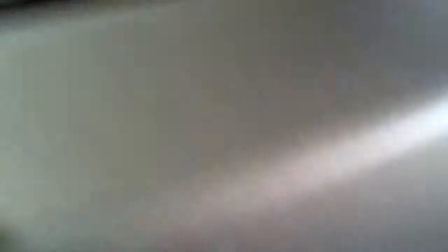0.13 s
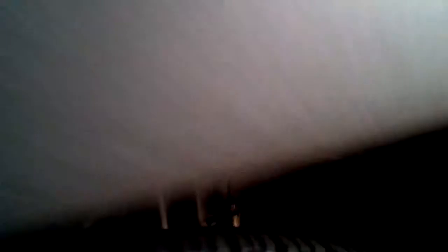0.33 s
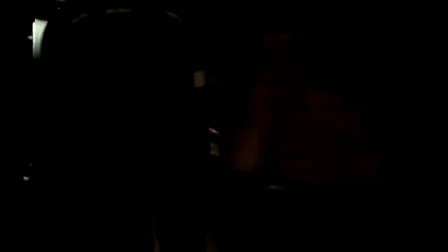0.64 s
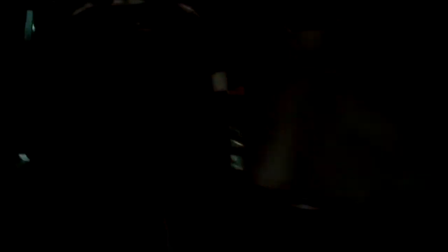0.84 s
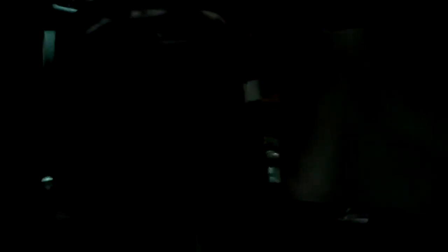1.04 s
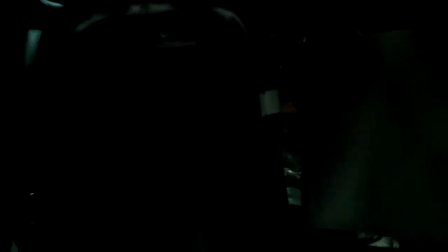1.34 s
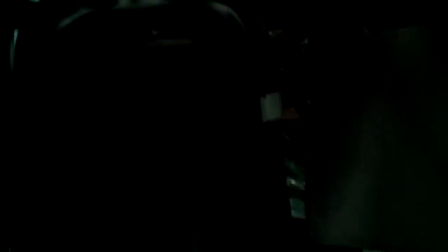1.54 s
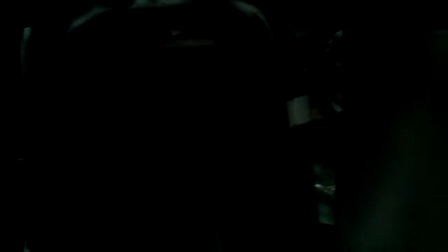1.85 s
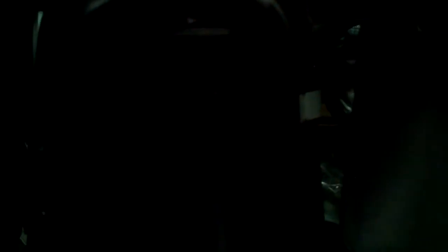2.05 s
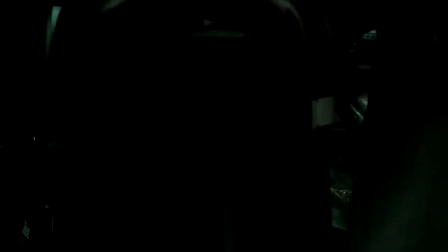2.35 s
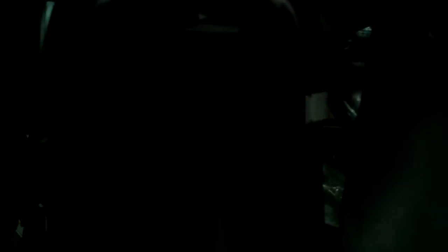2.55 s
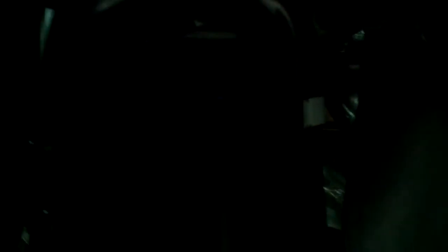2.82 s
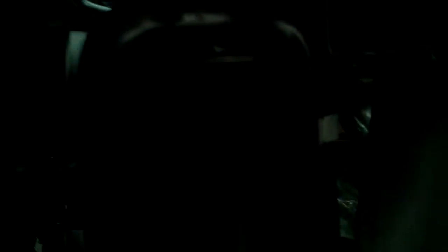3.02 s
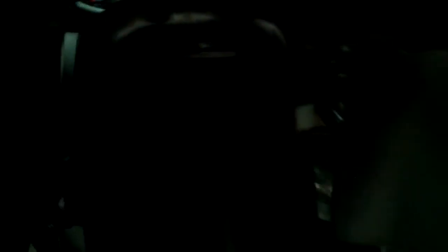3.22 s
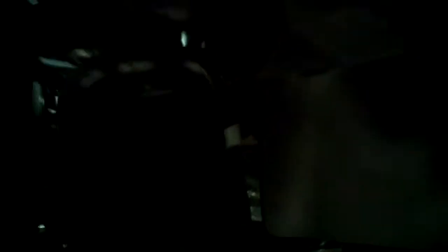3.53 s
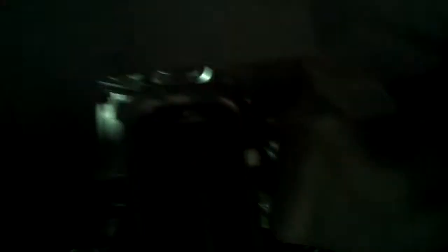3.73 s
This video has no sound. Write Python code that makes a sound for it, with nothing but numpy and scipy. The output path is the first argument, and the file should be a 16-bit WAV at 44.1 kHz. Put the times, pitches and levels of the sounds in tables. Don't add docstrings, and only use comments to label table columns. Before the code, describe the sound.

Close stereo phone capture in a dark engine bay: continuous engine idle, gritty valve ticking with a stronger tick about seven times a second, low fan hum, intake hiss and faint belt whistles, slightly softer at both ends.

```python
import sys
import numpy as np
from scipy import signal
from scipy.fft import rfft, irfft
from scipy.io import wavfile
from scipy.ndimage import uniform_filter1d

SR = 44100
rng = np.random.default_rng(int(sys.argv[2]) if len(sys.argv) > 2 else 0)


def persist_wave(psi):
    counts = np.round(np.clip(psi, -1, 1) * 32767).astype(np.int16)
    wavfile.write(sys.argv[1], SR, np.atleast_2d(counts).T)


def amplitude_ratio(level_db):
    exponent = np.asarray(level_db, float) / 20
    return 10 ** exponent


N = 171108
HZ = np.maximum(np.fft.rfftfreq(N, 1 / SR), 1)

# time in seconds, peak in dB.
TAPPET_HITS = [(0.081, -28), (0.233, -24), (0.379, -22), (0.527, -18.5), (0.6714, -17.5), (0.822, -17.5),
               (0.971, -15), (1.1224, -20.5), (1.2655, -14), (1.4126, -16.5), (1.5623, -15),
               (1.7084, -19.5), (1.86, -17.5), (2.009, -17), (2.1637, -18), (2.313, -13), (2.4665, -15.5),
               (2.617, -16), (2.7737, -16), (2.9233, -19), (3.0699, -18.5), (3.219, -19), (3.3732, -21),
               (3.5245, -14), (3.683, -19), (3.8399, -27)]
# place in the cycle as a share 0-1, tick in dB, knock in dB.
VALVE_CONTACTS = [
    (.025, 0, 2.5),
    (.19, -16, -1),
    (.37, -9, .5),
    (.55, -14, -1.5),
    (.71, -7, 0.5),
    (.88, -4, -1),
]


def in_time(rows):
    s, *columns = np.transpose(rows)
    return [np.interp(np.arange(N) / SR, s, c) for c in columns]


def in_hz(rows):
    hz, *columns = np.transpose(rows)
    return [np.interp(np.log(HZ), np.log(hz), c) for c in columns]


def colour(x, spectrum):
    below = np.maximum(np.log2(spectrum[0][0] / HZ), 0)
    above = np.maximum(np.log2(HZ / spectrum[-1][0]), 0)
    gain = amplitude_ratio(in_hz(spectrum)[0] - 38 * (below + above))
    return irfft(rfft(x) * gain * np.sqrt(SR / 2), N)


def drift(rate_hz):
    step = 40
    r = np.exp(-2 * np.pi * rate_hz * step / SR)
    white = rng.standard_normal(N // step + 2002)
    slow = signal.lfilter([1], [1, -2 * r, r * r], white)[2000:]
    return np.interp(np.arange(N) / step, np.arange(len(slow)), slow / slow.std())


def grit(grain_db):
    grain = np.minimum(rng.exponential(1, N), 3)
    x = rng.standard_normal((2, N)) * amplitude_ratio(grain_db * grain)
    return x / x.std()


def resonate(x, hz, width_hz):
    r = np.exp(-np.pi * width_hz / SR)
    poles = [1, -2 * r * np.cos(2 * np.pi * hz / SR), r * r]
    return signal.lfilter([(1 - r * r) / 2, 0, (r * r - 1) / 2], poles, x)


def bursts(cycle_db, contact_db, attack_s, decay_s, spread_db):
    jitter_s = 0.0012
    s = np.array(TAPPET_HITS)[:, 0]
    s = np.r_[2 * s[0] - s[1], s, 2 * s[-1] - s[-2]]
    at = s[:-1, None] + np.diff(s)[:, None] * np.array(VALVE_CONTACTS)[:, 0]
    at = at + rng.normal(0, jitter_s, at.shape)

    own = np.r_[cycle_db[0], cycle_db][:, None]
    shared = uniform_filter1d(np.r_[cycle_db, cycle_db[-1]], size=5)[:, None]
    db = np.where(contact_db > -1, own, shared) + contact_db
    db = db + spread_db * rng.standard_normal(at.shape) * (contact_db != 0)

    train = np.zeros(N + 2 * SR)
    train[((at.ravel() + 1) * SR).astype(int)] = amplitude_ratio(db.ravel())
    t = np.arange(SR // 10) / SR
    shape = np.exp(-t / decay_s) - np.exp(-t / attack_s)
    peak = np.argmax(shape)
    return signal.fftconvolve(train, shape / shape.max())[SR + peak:][:N]


def cooling_fan():
    # time in seconds, blade tone in Hz, level in dB.
    fan_curve = [(0, 130.5, -46), (.3, 131.5, -41), (.46, 129, -43), (.6, 121.5, -45), (.78, 117.3, -43),
                 (1.4, 117.3, -46), (2.2, 118, -50), (2.9, 119.8, -51), (3.88, 120, -56)]
    hz, db = in_time(fan_curve)
    turn = 2 * np.pi * np.cumsum(hz) / SR + [[0], [0.3]]
    blade = amplitude_ratio(db + 13 + 0.5 * drift(6.1)) * np.sin(turn)
    third = amplitude_ratio(-40 + 1.0 * drift(8.3)) * np.sin(3 * turn)
    return blade + third


def intake_and_belt(near_db):
    # frequency in Hz, density in dB per Hz.
    hiss = [(2700, -74), (3400, -74), (5300, -79), (6200, -77.5), (6600, -73), (9000, -72), (12000, -77),
            (15500, -80.5)]
    # frequency in Hz, width in Hz, level in dB.
    whistles = [
        (3912, 16, -65),
        (6706, 30, -61),
    ]
    air = colour(grit(-2), hiss)
    for hz, width_hz, db in whistles:
        line = resonate(rng.standard_normal((2, N)), hz, width_hz)
        line = resonate(line, hz, width_hz)
        air = air + amplitude_ratio(db) * line / line.std()
    return amplitude_ratio(near_db + 1.5 * drift(37.0)) * air


def valve_gear():
    # frequency in Hz, gain in dB.
    tick_colour = [(1200, -33), (2200, -19), (4500, -20), (6500, -27.5), (8700, -14), (10700, -7),
                   (12000, -16.5), (15500, -6.5)]
    # frequency in Hz, width in Hz, gain in dB.
    cover = [(1363, 49, -1.5), (7600, 870, -23), (8550, 800, 0.5), (9750, 1200, -8), (10820, 600, -2.5),
             (13000, 600, -11)]
    attack_s, decay_s, spread_db = 0.0045, 0.0082, 2
    cycle_db = np.array(TAPPET_HITS)[:, 1]
    contact_db = np.array(VALVE_CONTACTS)[:, 1]
    noise = grit(2.7)
    struck = bursts(cycle_db, contact_db, attack_s, decay_s, spread_db)
    ticks = colour(noise * struck, tick_colour) / np.sqrt(SR / 2)
    for hz, width_hz, db in cover:
        struck = bursts(cycle_db, contact_db - 0.01, attack_s, decay_s, spread_db)
        ticks = ticks + amplitude_ratio(db) * resonate(noise * struck, hz, width_hz)
    return amplitude_ratio(-6) * ticks


def firing_orders():
    # time in seconds, firing rate in Hz, level of the sixth multiple in dB.
    firing = [(0.0, 41.2, -40.5), (0.37, 40.55, -34), (0.86, 40.08, -36.5), (1.56, 40.58, -34),
              (2.02, 39.8, -38.5), (2.38, 39.87, -37.5), (3.23, 40.32, -37), (3.26, 39.9, -46),
              (3.66, 38.76, -41), (3.88, 39.55, -53)]
    # multiple of the firing rate, level in dB.
    orders = [(2, -18.5), (4, -1.5), (5, 1), (6, 8.5), (6.5, -4), (6.9, -4.5), (8, -10.5), (10.5, -16)]
    mean_db, follow = -36, 0.15
    hz, sixth_db = in_time(firing)
    turn = 2 * np.pi * np.cumsum(hz) / SR
    out = 0
    for k, level_db in orders:
        db = sixth_db if k == 6 else mean_db + follow * (sixth_db - mean_db)
        level = amplitude_ratio(db + level_db + 1.0 * drift(4.2))
        wander = 0.3 * drift(2.8)
        out = out + level * np.sin(k * turn + wander + [[k], [k + 0.25]])
    return out


def block(near_db):
    # frequency in Hz, density in dB per Hz.
    roar_colour = [(85, -64), (110, -69), (200, -56.5), (450, -60), (590, -69.5), (1100, -68.5),
                   (2350, -72.5), (2550, -75)]
    # frequency in Hz, width in Hz, level in dB.
    panels = [(245.4, 41, -38.5), (327, 17, -53), (429, 8.6, -44.5), (531, 23, -46.5), (664.8, 15.5, -41),
              (832, 150, -45), (956, 74, -47), (1166, 16, -52), (1359, 48, -41.5), (2540, 27, -52),
              (1770, 35, -52), (2109, 40, -45.5), (2194, 18, -50.5), (2362, 39, -47)]
    # time in seconds, share removed 0-1.
    hollow = [(0, 0), (.9, 0), (1.2, 0.68), (1.7, 0.42), (2.1, 0.24), (2.5, 0.35), (2.9, 0), (3.3, 0.88),
              (3.6, 0.34)]
    knock = bursts(np.zeros(len(TAPPET_HITS)), np.array(VALVE_CONTACTS)[:, 2],
                   attack_s=0.00747, decay_s=0.0083, spread_db=2)
    knock = knock / np.sqrt(np.mean(knock ** 2))
    roar = colour(grit(1.0) * (0.91 + 0.25 * knock), roar_colour)
    out = amplitude_ratio(0.64 * near_db + 0.5 * drift(1.0)) * roar
    for hz, width_hz, db in panels:
        shaking = rng.standard_normal((2, N)) * (0.5 + 0.5 * knock)
        rung = resonate(shaking * amplitude_ratio(0.98 * near_db + 0.8 * drift(2.6)), hz, width_hz)
        out += amplitude_ratio(db) * rung / rung.std()
    return out - in_time(hollow)[0] * resonate(out, hz=704, width_hz=220)


def scene():
    # time in seconds, hiss level in dB.
    closeness = [
        (0.0, -36),
        (0.2, -36),
        (0.69, -30.5),
        (2.19, -30.5),
        (2.71, -31),
        (3.11, -30.5),
        (3.5, -30.5),
        (3.7, -31),
        (3.88, -34),
    ]
    # frequency in Hz, level in dB,
    # likeness in step (-1 to 1), likeness a quarter cycle ahead (-1 to 1).
    ports = [(110, -26.5, 0.33, 0.48), (245, -24.5, 0.51, .2), (503, -8, 0.01, 0.37),
             (1110, -4.5, 0.0043, 0.16), (1940, 2, 0.36, 0.25), (3320, -0.1, 0.03, 0.024),
             (9000, 0, 0.28, 0.05), (14100, -0.4, -.2, 0.05)]
    near_db, = in_time(closeness)
    near_db = near_db - np.median(near_db)
    engine = cooling_fan() + intake_and_belt(near_db) + valve_gear() + firing_orders() + block(near_db)
    both, other = rfft(engine)
    db, in_step, ahead = in_hz(ports)
    alike = in_step + 1j * ahead
    unlike = np.sqrt(np.clip(1 - np.abs(alike) ** 2, 0, 1))
    apart = amplitude_ratio(db) * (alike * both + unlike * other)
    return irfft([both + apart, both - apart], N)


def top_cut(x):
    return signal.sosfilt(signal.butter(12, 16050, fs=SR, output="sos"), x)


def record(dry):
    late = np.roll(dry[::-1], 15, axis=1)
    low_pass = signal.ellip(14, 0.5, 70, 15730, fs=SR, output="sos")
    mix = signal.sosfilt(low_pass, dry - late)
    return top_cut(mix)


dry = scene()
out = record(dry)
persist_wave(out)
```